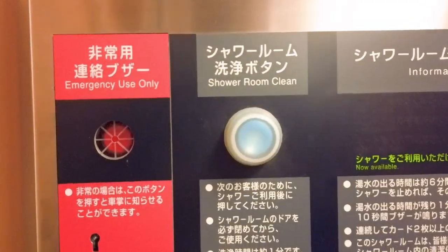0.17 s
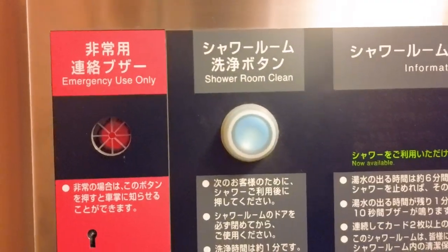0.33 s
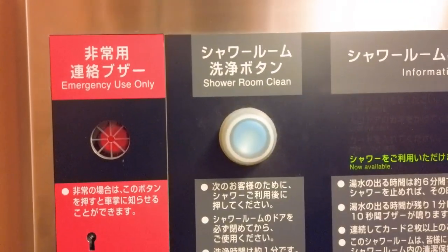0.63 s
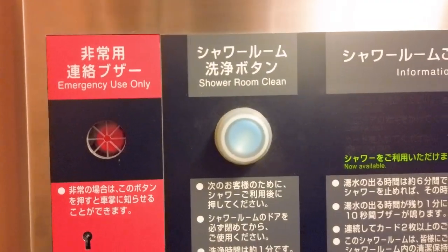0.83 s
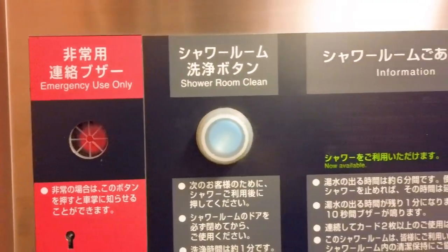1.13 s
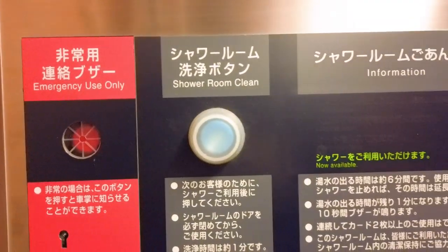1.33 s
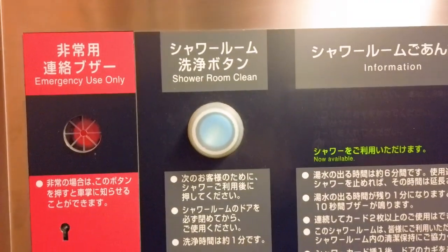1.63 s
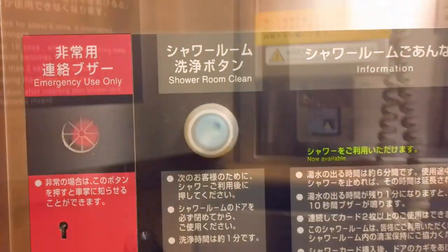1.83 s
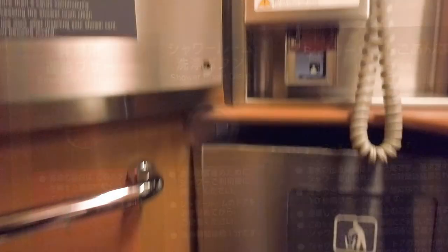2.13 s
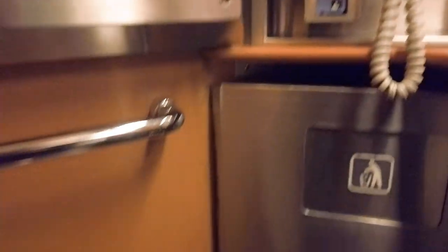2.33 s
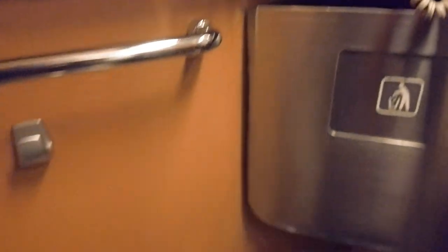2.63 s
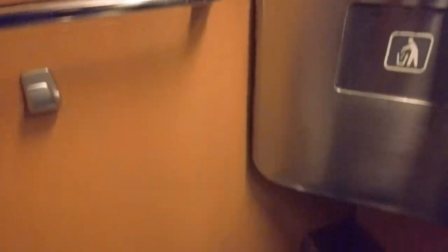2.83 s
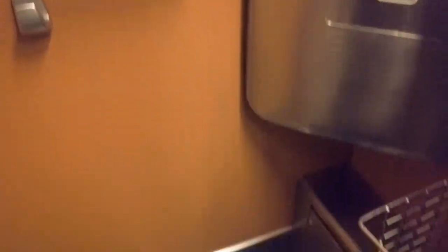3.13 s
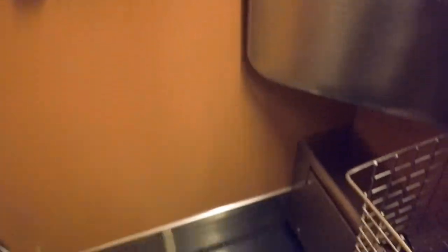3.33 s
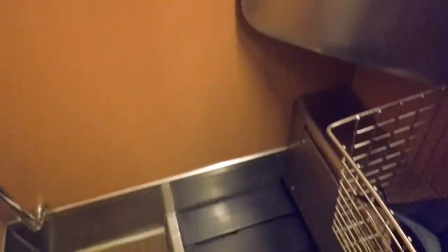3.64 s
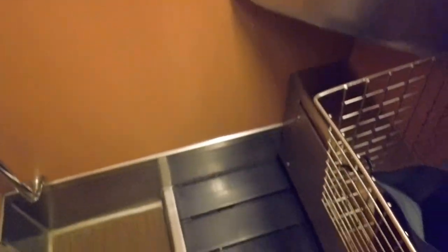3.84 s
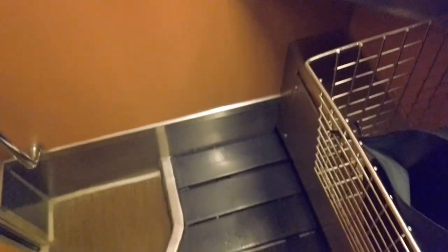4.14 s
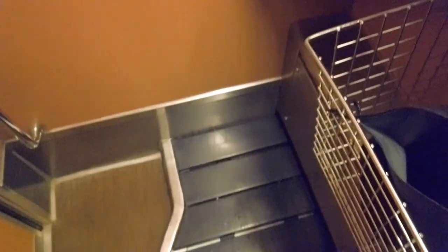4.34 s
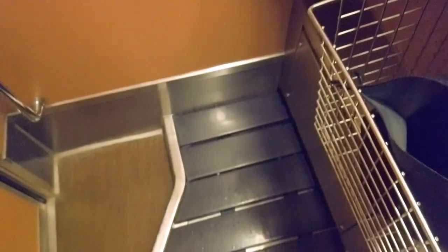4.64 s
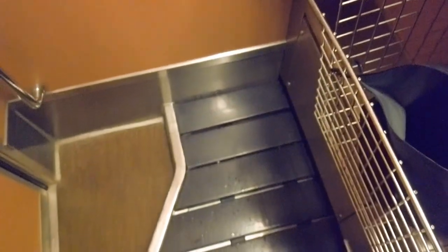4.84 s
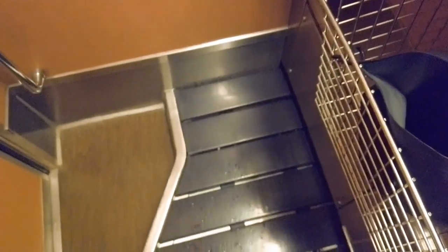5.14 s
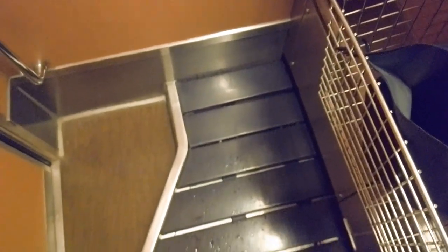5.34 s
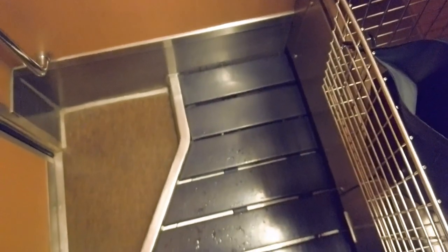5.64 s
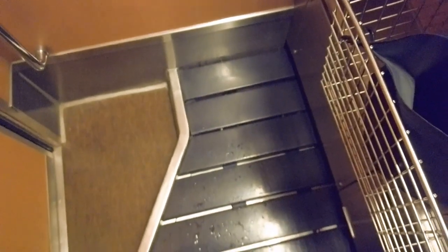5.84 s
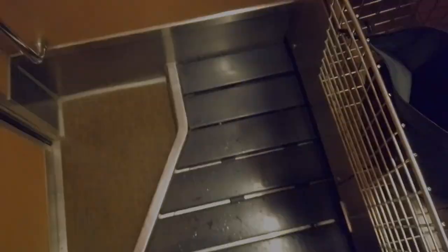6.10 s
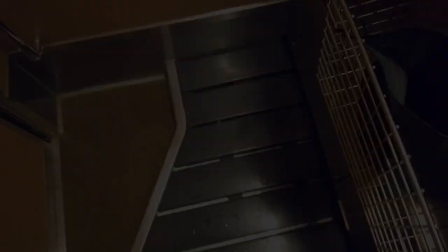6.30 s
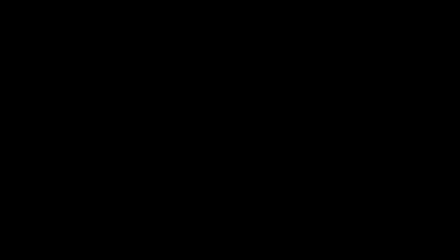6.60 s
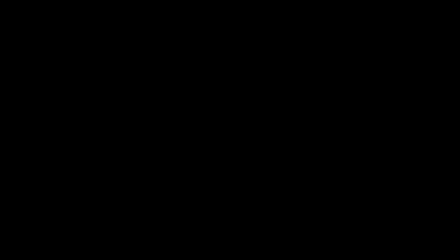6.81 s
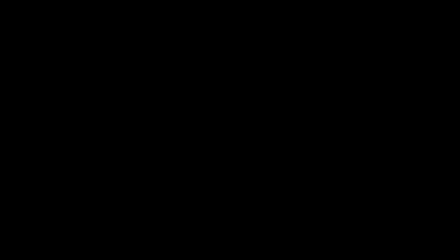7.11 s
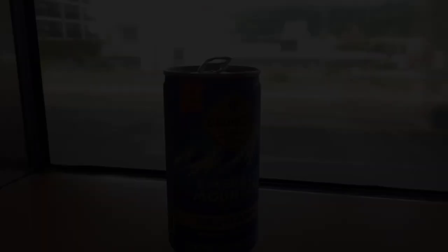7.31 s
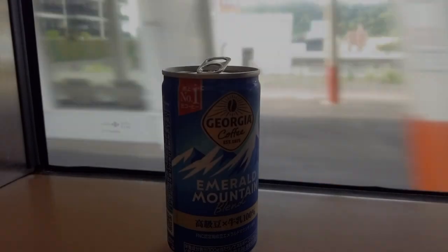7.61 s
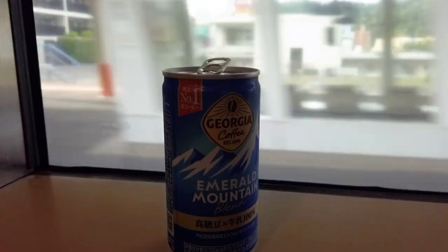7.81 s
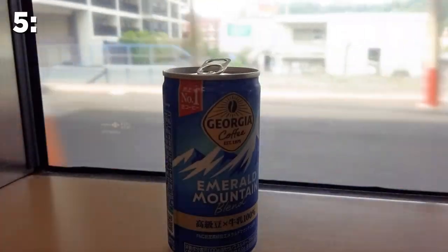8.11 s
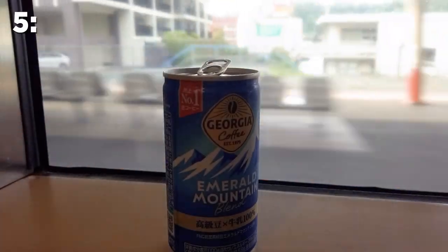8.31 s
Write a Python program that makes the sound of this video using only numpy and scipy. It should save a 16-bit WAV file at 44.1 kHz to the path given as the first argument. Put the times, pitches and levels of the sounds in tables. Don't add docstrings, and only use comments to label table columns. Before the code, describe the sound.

Muffled shower jets surge, cut to a wider hiss on a slatted floor, stop dead; after silence, sharp plastic keys clatter over a low train rumble.

```python
import sys
import numpy as np
from scipy import signal
from scipy.io import wavfile
from scipy.ndimage import map_coordinates

SR = 44100
rng = np.random.default_rng(int(sys.argv[2]) if len(sys.argv) > 2 else 0)


def linear_from_db(decibels):
    return 10 ** (np.asarray(decibels, float) / 20)


def file_out(sig):
    cols = np.atleast_2d(sig).T
    lim = np.clip(cols, -1, 1)
    pcm = np.round(lim * 32767).astype(np.int16)
    wavfile.write(sys.argv[1], SR, pcm)


N = 373086

PANEL_S, FLOOR_S, SEAT_S = (0, 1.955), (1.955, 6.466), (7.2964, 8.46)  # start_s, end_s
WIN, HOP = 2048, 512
TOP_HZ = 15750


def clock(span_s):
    return np.arange(int(span_s[0] * SR), min(int(span_s[1] * SR), N)) / SR


def read(table, hz):
    row_hz, row_db = np.transpose(table)
    return np.interp(np.log(hz + 1e-9), np.log(row_hz), row_db)


def unit(x):
    return x / np.sqrt(np.mean(x ** 2))


def band(x, hz, width_hz):
    return signal.lfilter(*signal.iirpeak(min(hz, .45 * SR), hz / width_hz, fs=SR), x)


def swells(t, rest_db, rows):
    return linear_from_db(rest_db) + sum(linear_from_db(db) * np.exp(-.5 * ((t - s) / half_s) ** 2) for s, db, half_s in rows)


def drops(count, per_s, spread_db, share):
    hit = rng.random(count) < per_s / SR
    size = np.minimum(rng.exponential(size=count), 4.5)
    sign = np.sign(rng.random(count) - .5)
    hiss = rng.standard_normal(count)
    taps = unit(hit * linear_from_db(spread_db * size) * sign)
    return np.sqrt(1 - share) * hiss + np.sqrt(share) * taps


def patches(hz, count, per_s, octaves):
    cells = rng.standard_normal((64, 256))
    pitch = np.log2(1 + hz / 20) / octaves
    time = np.arange(count) * HOP / SR * per_s
    return map_coordinates(cells, np.meshgrid(pitch, time, indexing="ij"), order=1) * 1.78


def gaps(hz, count, from_hz, share):
    keep = rng.random((64, count // 3 + 1)) > share
    rows = (hz / 700).astype(int)
    keep = np.repeat(keep, 3, axis=1)[rows, :count] / np.sqrt(1 - share)
    return np.where(hz[:, None] > from_hz, keep, 1)


def streaks(rows, count, hole_db):
    cells = rng.standard_normal((rows // 8 + 1, count // 6 + 1))
    cells = np.repeat(np.repeat(cells, 8, axis=0), 6, axis=1)
    return linear_from_db(hole_db + 4.4 * cells[:rows, :count])


def wash(mid, side, start_s, colours, side_db, ref_hz, swell_db, flicker_db, flicker_per_s,
         gap_hz=3300, gap_share=0., hole_db=-99, shade=None):
    grid = dict(fs=SR, nperseg=WIN, noverlap=WIN - HOP)
    hz, t, mid_lines = signal.stft(mid, **grid)
    side_lines = signal.stft(side, **grid)[2]
    t = t + start_s

    shapes_db = np.array([read(spectrum, hz) for _, spectrum in colours])
    index = np.arange(len(colours))
    place = np.interp(t, [s for s, _ in colours], index)
    blend = np.clip(1 - abs(place - index[:, None]), 0, 1)
    gain_db = shapes_db.T @ blend
    if shade:
        gain_db = gain_db + shade(hz[:, None], t)
    gain = linear_from_db(gain_db) * (hz < TOP_HZ)[:, None]

    ref = (hz > ref_hz[0]) & (hz < ref_hz[1])
    gain /= np.sqrt((gain[ref] ** 2).sum(axis=0) / len(hz))
    swell = swell_db * patches(hz, len(t), 2.31, 0.403)
    flicker = flicker_db * patches(hz, len(t), flicker_per_s, 0.705)
    gain *= linear_from_db(swell + flicker)
    gain *= (gain > streaks(len(hz), len(t), hole_db)) | (abs(hz - 11400) > 1900)[:, None]

    width = linear_from_db(read(side_db, hz))[:, None] * gaps(hz, len(t), gap_hz, gap_share)
    m = signal.istft(mid_lines * gain, **grid)[1][:len(mid)]
    s = signal.istft(side_lines * gain * width, **grid)[1][:len(mid)]
    return np.array([m + s, m - s])


# start_s, depth_db, length_ratio (of LULL_S)
LULLS = [(.31, -2, 1.9), (.41, -0.5, .8), (.6, -2.5, .8), (.7, -0.5, 1.1), (.78, -1.5, .9), (.9, -2.2, 1.1),
         (1.11, -4, 1.5), (1.43, -4, 1.1), (1.6, -1.5, 1.1), (1.84, -3.5, 1.5), (1.96, -4, 1.2)]
SURGE_DB, SURGE_FALL_S, LULL_S = 6, 0.16, 0.023


def pressure_db():
    t = clock(PANEL_S)
    lulls = sum(db * np.exp(-.5 * ((t - s) / (LULL_S * ratio)) ** 2) for s, db, ratio in LULLS)
    return SURGE_DB * np.exp(-(t / SURGE_FALL_S) ** 1.1) + lulls


# pitch_hz, side_re_mid_db
PANEL_SIDE = [(60, -38.5), (110, -34), (200, -34.5), (380, -20), (700, -19), (1290, -12.5), (2380, -7),
              (4400, 0.5), (8120, -5.5), (15000, 0.5)]
# pitch_hz, level_db_per_hz
SURGE_COLOUR = [(290, -42), (500, -9), (991, -3), (1310, -5.5), (1540, -2), (2100, -6.5), (3240, -0.5),
                (5000, -9.5), (6500, -45.5)]
STEADY_COLOUR = [(290, -40), (500, -11.5), (640, -10.5), (786, -4.5), (1330, -8.5), (1900, -7), (3100, -2),
                 (5000, -7), (6500, -41.5)]
# [pitch_hz, level_db_per_hz]
MIST_COLOUR = [(1, [(2940, -42), (5000, -4.5), (7250, 1), (10200, -1.5), (10600, -1), (11400, -8.5),
               (15200, -16), (15600, -16)])]
# pitch_hz, level_db_per_hz
PANEL_RUMBLE = [(8.8, -30.5), (15, 3.5), (38, -1.5), (101, -12.5), (117, -18), (141, -34), (160, -23),
                (210, -54), (350, -120)]
# pitch_hz, level_db_per_hz
PANEL_DRAIN = [(76, -39), (130, -8), (145, -12.5), (172, -3.5), (253, -2.5), (398, -8), (520, -6.5),
               (680, -37), (1140, -120)]
# start_s, level_db, half_length_s
PANEL_JOLTS = [
    (0, -30.5, .015),
    (.3, -46.5, .08),
    (.62, -42.5, .08),
    (.85, -42.5, .06),
    (1.14, -47, .05),
    (1.41, -48.5, .05),
    (1.77, -43.5, .04),
]
MIST_DB, SPLASH_DB, PANEL_DRAIN_DB, PANEL_BODY_DB = -34, -36.5, -51.5, -44
SPLASH_FOLLOWS, DRAIN_FOLLOWS = 0.95, 1.1
SURGE_ENDS_S, STEADY_FROM_S = 0.11, 0.55


def spray_at_panel():
    t = clock(PANEL_S)
    mist_db = MIST_DB + pressure_db()
    splash_db = SPLASH_DB + SPLASH_FOLLOWS * (mist_db - mist_db.mean())
    drain_db = PANEL_DRAIN_DB + DRAIN_FOLLOWS * (splash_db - splash_db.mean())
    jets = [drops(len(t), per_s=4000, spread_db=1.9, share=0.18) for _ in range(4)]
    noise = rng.standard_normal((4, len(t)))
    splash_colours = [(SURGE_ENDS_S, SURGE_COLOUR), (STEADY_FROM_S, STEADY_COLOUR)]
    splash = wash(*jets[:2], 0, splash_colours, PANEL_SIDE, ref_hz=(700, 5000), swell_db=.4,
                  flicker_db=1.2, flicker_per_s=12, gap_hz=4200, gap_share=.4)
    mist = wash(*jets[2:], 0, MIST_COLOUR, PANEL_SIDE, ref_hz=(5000, 15700), swell_db=.6,
                flicker_db=0.97, flicker_per_s=16, gap_hz=4214, gap_share=.35)
    rumble = wash(*noise[:2], 0, [(0, PANEL_RUMBLE)], PANEL_SIDE, ref_hz=(20, 110), swell_db=0,
                  flicker_db=0, flicker_per_s=1)
    drain = wash(*noise[2:], 0, [(0, PANEL_DRAIN)], PANEL_SIDE, ref_hz=(130, 520), swell_db=.8,
                 flicker_db=1.8, flicker_per_s=8)
    water = splash * linear_from_db(splash_db) + mist * linear_from_db(mist_db) + drain * linear_from_db(drain_db)
    return water + rumble * swells(t, PANEL_BODY_DB, PANEL_JOLTS)


VALVE_S, VALVE_DB, VALVE_RISE_S, FADE_DB_S = 6.213, 4.1, 0.048, 125
DIP_S, DIP_HZ, DIP_WIDTH_HZ, DIP_DB = (4.5, 6.08), (12000, 11200), 940, -16


def floor_echo(hz, t):
    sunk = np.interp(t, [*DIP_S, VALVE_S], [0, 1, 0])
    centre_hz = np.interp(t, DIP_S, DIP_HZ)
    return DIP_DB * sunk ** 0.77 * np.exp(-.5 * ((hz - centre_hz) / DIP_WIDTH_HZ) ** 2)


# pitch_hz, side_re_mid_db
FLOOR_SIDE = [(60, -4), (110, 0), (200, -2), (380, -4), (700, -2.5), (1290, -6), (2380, 0.5), (4400, -4),
              (8120, -3.5), (15000, -7.5)]
# pitch_hz, level_db_per_hz
HIGH = [(240, -35.5), (400, -2), (874, -2), (2330, -2), (4720, -8.5), (6820, -9), (8190, -5), (11700, -8.5),
        (15600, -6.5)]
LOW = [(240, -31.5), (450, -3.5), (900, -3), (1250, -2), (1520, 2), (1900, -3), (5750, -14), (8300, -9),
       (15600, -10)]
TRICKLE = [(240, -31), (452, -5), (634, -11), (3500, -26.5), (6000, -25), (10800, -17), (15600, -27)]
# pitch_hz, level_db_per_hz
GEAR = [(8.8, -29.5), (15, 1.5), (86, -3), (162, -1), (284, -2), (400, -1), (520, -27), (880, -120)]
JOLT = [(8.8, -39.5), (15, -9), (63, -8.5), (119, -32), (265, -39.5), (880, -120)]
# start_s, level_db, half_length_s
FLOOR_JOLTS = [
    (2.57, -54, 0.045),
    (3.03, -54, 0.036),
    (3.2, -53, 0.043),
    (5.55, -55.5, 0.023),
    (6.19, -49.5, 0.04),
]
LAST_JOLT = [
    (6.41, -50, 0.027),
]
LOWERING_S, TRICKLE_S = (3.3, 4.65), (6.23, 6.33)
HISS_DB, HISS_SAG_DB_S, TRICKLE_DB = -33.5, 1.11, -74
FLOOR_BODY_DB, FLOOR_BODY_SAG_DB_S, GEAR_REST_DB = -47.5, 1.83, -67


def spray_on_floor():
    t = clock(FLOOR_S)
    since_s = t - t[0]
    fade_db = -FADE_DB_S * np.maximum(t - VALVE_S, 0)
    kick_db = VALVE_DB * np.exp(np.minimum(t - VALVE_S, 0) / VALVE_RISE_S)
    flow = linear_from_db(HISS_DB - HISS_SAG_DB_S * since_s + kick_db + fade_db) + linear_from_db(TRICKLE_DB)
    colours = list(zip(LOWERING_S + TRICKLE_S, (HIGH, LOW, LOW, TRICKLE)))
    jets = [drops(len(t), per_s=4500, spread_db=2.0, share=0.22) for _ in range(2)]
    hiss = wash(*jets, FLOOR_S[0], colours, FLOOR_SIDE, ref_hz=(400, 15700), swell_db=.6, flicker_db=.6,
                flicker_per_s=16, gap_share=.45, hole_db=-12.5, shade=floor_echo)
    noise = rng.standard_normal((4, len(t)))
    gear = wash(*noise[:2], 0, [(0, GEAR)], FLOOR_SIDE, ref_hz=(20, 350), swell_db=1.8,
                flicker_db=1.5, flicker_per_s=8)
    jolt = wash(*noise[2:], 0, [(0, JOLT)], FLOOR_SIDE, ref_hz=(20, 350), swell_db=0,
                flicker_db=0, flicker_per_s=1)
    body_db = FLOOR_BODY_DB - FLOOR_BODY_SAG_DB_S * since_s
    body = swells(t, body_db, FLOOR_JOLTS) * linear_from_db(fade_db) + linear_from_db(GEAR_REST_DB)
    return hiss * flow + gear * body + jolt * swells(t, -99, LAST_JOLT)


# [pitch_hz, level_db_per_hz]
SEAT_COLOUR = [(7.5, [(24, -34), (40, -6.5), (161, -9.5), (244, -6), (278, -7.5), (306, -9.5), (376, -8),
               (437, -17.5), (1210, -22.5), (1970, -31), (2420, -30.5), (3280, -39.5), (3600, -46.5),
               (4680, -82.5), (7920, -120)])]
# pitch_hz, level_db_per_hz
SEAT_HISS = [(2120, -32), (3600, 0), (7700, -6), (11000, -1), (12300, -6), (13000, -9), (15600, -12.5)]
# pitch_hz, side_re_mid_db
SEAT_SIDE = [(60, -19.5), (110, -21), (200, -23.5), (380, -15), (700, -16.5), (1290, -9), (2380, -1.5),
             (4400, 0.5), (8120, -5), (15000, 0)]
# pitch_hz, width_hz
SEAT_HUMS = [
    (283, 17.4),
    (94.4, 13),
    (30, 16),
]
# start_s, level_db, half_length_s
HUM_SWELLS = [
    [(7.41, -27.5, .05), (7.6, -31, .025), (7.82, -33, .04), (7.92, -35.5, .04), (8.05, -32.5, .03),
     (8.28, -36, .06)],
    [(7.3, -34, .04), (7.56, -41.5, .04), (7.89, -36, .05), (8.27, -29, .05), (8.44, -45.5, .04)],
    [(7.41, -26, .04), (7.62, -32, .05), (7.88, -44, .03), (8.1, -37.5, .08), (8.4, -31, .05)],
]
ROAR_DB, SEAT_HISS_DB, HUM_REST_DB = -31, -59, (-47, -45.5, -42)


def carriage():
    t = clock(SEAT_S)
    noise = rng.standard_normal((7, len(t)))
    roar = wash(*noise[:2], SEAT_S[0], SEAT_COLOUR, SEAT_SIDE, ref_hz=(120, 900), swell_db=0.5,
                flicker_db=1.0, flicker_per_s=14)
    air = wash(*noise[5:], 0, [(0, SEAT_HISS)], SEAT_SIDE, ref_hz=(3600, 15700), swell_db=0.62,
               flicker_db=0.48, flicker_per_s=8.2, gap_hz=4520, gap_share=.5)
    out = roar * linear_from_db(ROAR_DB) + air * linear_from_db(SEAT_HISS_DB)
    for (hz, width_hz), rest_db, rows, push in zip(SEAT_HUMS, HUM_REST_DB, HUM_SWELLS, noise[2:5]):
        ring = signal.hilbert(band(band(push, hz, width_hz), hz, width_hz))
        hum = unit((ring / abs(ring) ** .7).real)
        out = out + hum * swells(t, rest_db, rows)
    step = (linear_from_db(-18.5) + out[:, :1]) * np.exp(-np.arange(len(t)) / SR / .0013)
    return out - step


STROKE_MS = np.arange(-200, 800) / SR * 1000


def stroke(ms, rise_ms, fall_ms):
    rise = 2. ** -(ms / rise_ms) ** 2
    fall = 2. ** -(abs(ms / fall_ms) ** 1.2)
    return np.where(ms < 0, rise, fall)


def place(out, peak_s, sound):
    out[int(peak_s * SR) - 200:][:len(sound)] += sound


# start_s, length_ms, level_db, pitch_hz
RUBS = [(7.701, 6.6, -39, 2600), (7.943, 10, -30.5, 2960), (8.017, 5, -23, 2200), (8.115, 6, -26.5, 2980),
        (8.186, 7.7, -40.5, 2960), (8.197, 5, -21, 2170), (8.265, 12, -32.5, 2490), (8.396, 7.1, -30, 2500),
        (8.412, 7, -28, 2107)]


def stem_rubs(out):
    ms = STROKE_MS
    for s, length_ms, db, hz in RUBS:
        grit, slips = rng.standard_normal((2, len(ms)))
        held_ms = np.where(ms > 0, np.maximum(ms - length_ms, 0), ms)
        rub = unit(band(band(grit * slips, hz, 1100), hz, 1600)) + .05 * grit
        place(out, s, linear_from_db(db) * stroke(held_ms, .5, 0.7) * rub)


# peak_s, level_db, pitch_hz, fall_ms
CLACKS = [(7.705, -19, 2200, 0.55), (7.7177, 1, 2180, .57), (7.8295, -12.5, 2350, .6),
          (7.831, -16, 2440, .4), (7.946, -6.5, 3350, 0.51), (7.95, 3.5, 2050, .3),
          (8.0152, -7.5, 2460, 0.2), (8.0203, -16.5, 2200, .38), (8.1184, -14, 3100, 0.58),
          (8.12, -15, 2220, 1.1), (8.1276, -4, 1900, 0.23), (8.1303, -18.5, 2170, 0.22),
          (8.1967, -12, 2930, .4), (8.2017, -14, 2030, 0.21), (8.2787, -18.5, 2380, .35),
          (8.2826, -3.5, 2150, 0.43), (8.2866, -12.5, 2210, .35), (8.3908, -14, 2330, 1.6),
          (8.402, -21, 2380, 0.82), (8.4043, -17.5, 2500, .4), (8.411, -0.5, 2190, 0.48),
          (8.4128, -14, 1530, .25), (8.4164, -15, 1260, .45)]
RISE_SHARE, CRACK_DB = 0.67, -10
REBOUND_MS, REBOUND_DB, REBOUND_LOSS_DB, REBOUND_HZ, REBOUND_FALL_MS = 1.9, -18, 2.5, 2130, 0.66


def cap_clacks(out):
    ms = STROKE_MS
    hits = list(CLACKS)
    for s, db, _, _ in CLACKS:
        for k, uneven in enumerate(rng.standard_normal(3)):
            later_s = s + REBOUND_MS * (k + 1 + .2 * uneven) / 1000
            hits.append((later_s, db + REBOUND_DB - k * REBOUND_LOSS_DB, REBOUND_HZ, REBOUND_FALL_MS))
    for s, db, hz, fall_ms in hits:
        ring = np.cos(2 * np.pi * hz * ms / 1000) * stroke(ms, RISE_SHARE * fall_ms, fall_ms)
        burst = rng.standard_normal(len(ms)) * stroke(ms + .3, 0.1, 0.2)
        crack = band(band(burst, 3480, 2400), 3700, 3200)
        place(out, s, linear_from_db(db) * (ring + linear_from_db(CRACK_DB) * crack / abs(crack).max()))


# peak_s, level_db, pitch_hz
TICKS = [(7.7078, -24.5, 10100), (7.7132, -22, 7890), (7.7173, -23, 6140), (7.8285, -34, 5040),
         (7.9449, -14.5, 10140), (7.9485, -17.5, 9170), (8.0148, -22.5, 10000), (8.1169, -26.5, 5290),
         (8.1193, -22, 9690), (8.1236, -14, 9840), (8.1313, -27, 9780), (8.1954, -30.5, 7200),
         (8.1993, -32, 5820), (8.2014, -35.5, 7740), (8.2689, -28.5, 11200), (8.2758, -22, 5610),
         (8.2828, -29, 6090), (8.401, -23.5, 13130), (8.4059, -20, 9480), (8.4103, -21.5, 4980)]
TICK_RISE_MS, TICK_FALL_MS = 0.4, 0.98


def leaf_ticks(out):
    for s, db, hz in TICKS:
        grit = rng.standard_normal(len(STROKE_MS))
        tick = band(grit, hz, 2300) + 0.39 * band(grit, 13000, 12000)
        tick = tick * stroke(STROKE_MS, TICK_RISE_MS, TICK_FALL_MS)
        place(out, s, linear_from_db(db + 4.0) * tick / abs(tick).max())


# pitch_hz, width_hz, level_db, t60_s
TRAY = [
    (1286, 260, 0.5, 0.15),
    (2200, 420, -9.5, 0.16),
    (3320, 1300, -10, .07),
    (4780, 1700, -25.5, .05),
    (9500, 4400, 1.5, 0.038),
    (10200, 4000, -16.5, .16),
]


def tray_rattle(strokes):
    t = np.arange(6000) / SR
    tray = np.zeros(len(t))
    for hz, width_hz, db, t60_s in TRAY:
        rattle = rng.standard_normal(len(t)) * (1 - np.exp(-t / 0.00094))
        tray += linear_from_db(db) * band(rattle, hz, width_hz) * np.exp(-np.log(1000) * t / t60_s)
    return linear_from_db(-52.0) * signal.fftconvolve(strokes, unit(tray))[:N]


def keys():
    strokes = np.zeros(N + 2000)
    stem_rubs(strokes)
    cap_clacks(strokes)
    leaf_ticks(strokes)
    out = strokes[:N] + tray_rattle(strokes)
    return signal.sosfilt(signal.butter(N=10, Wn=15800, fs=SR, output="sos"), out)


def scene():
    out = np.zeros((2, N))
    for span_s, source, edge_samples in ((PANEL_S, spray_at_panel, 60), (FLOOR_S, spray_on_floor, 60),
                                         (SEAT_S, carriage, 1)):
        part = source()
        count = np.arange(part.shape[1])
        edge = np.minimum(count, count[::-1])
        out[:, int(span_s[0] * SR):][:, :len(count)] += part * np.minimum((edge + 1) / edge_samples, 1)
    return out + keys()


def band_limit(x):
    return signal.sosfilt(signal.butter(12, 16970, fs=SR, output="sos"), x)


def record(dry):
    mix = np.clip(dry, -1, 1)
    return band_limit(mix)


dry = scene()
out = record(dry)
file_out(out)
```